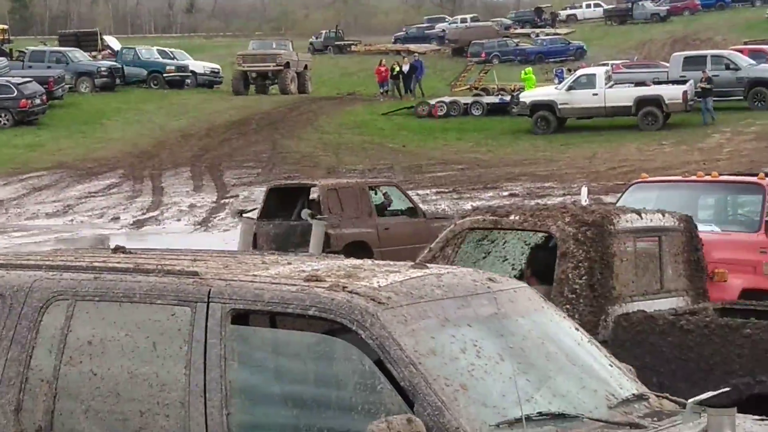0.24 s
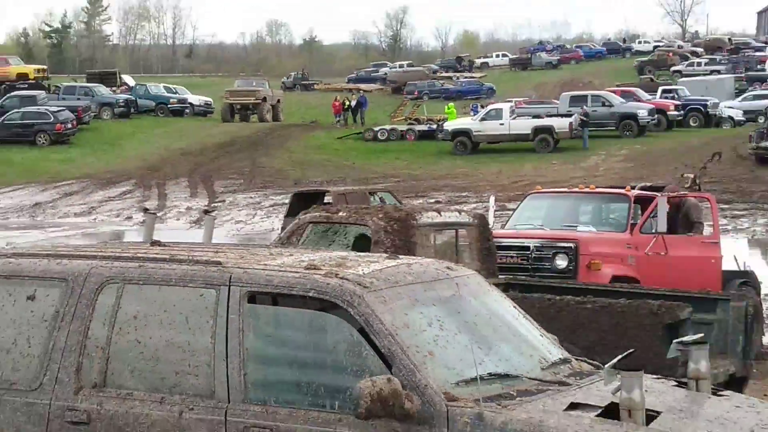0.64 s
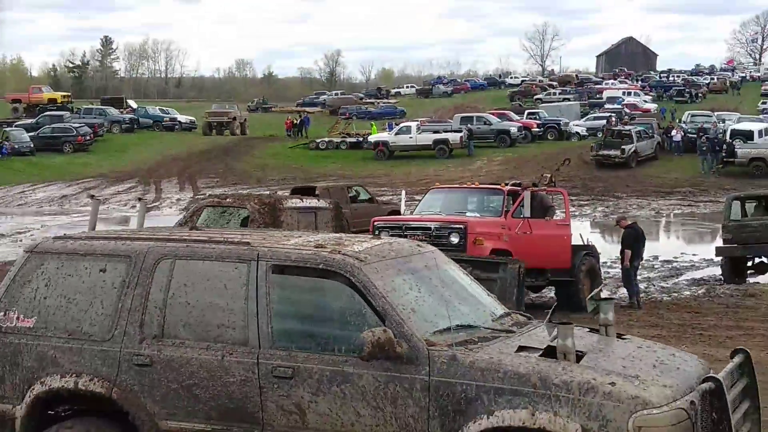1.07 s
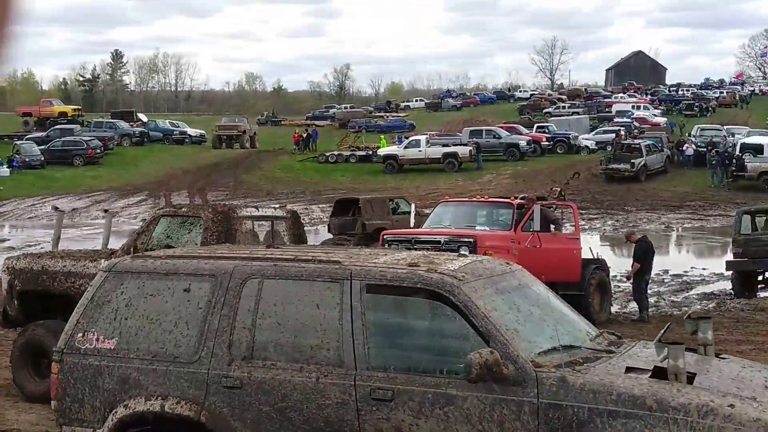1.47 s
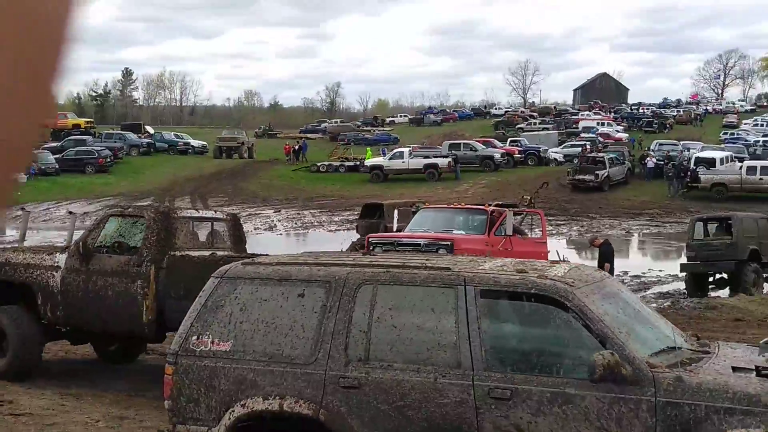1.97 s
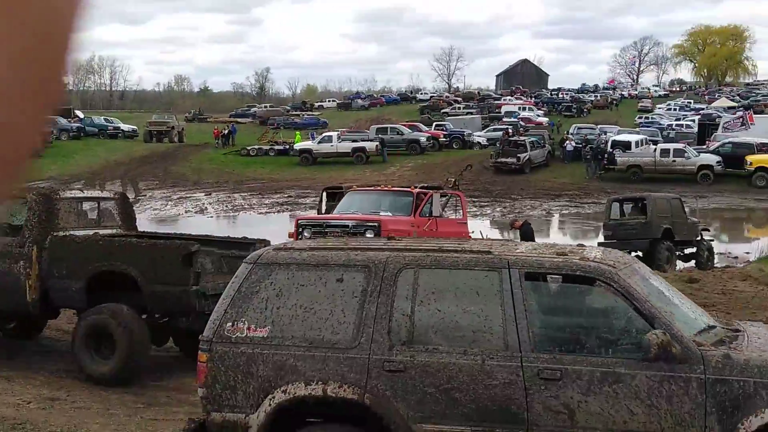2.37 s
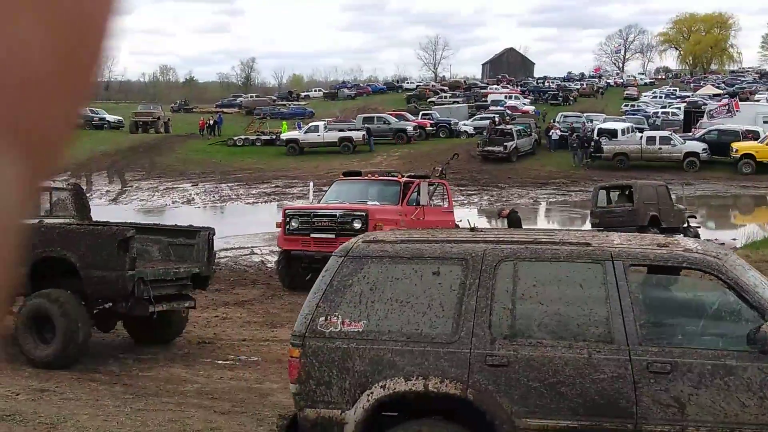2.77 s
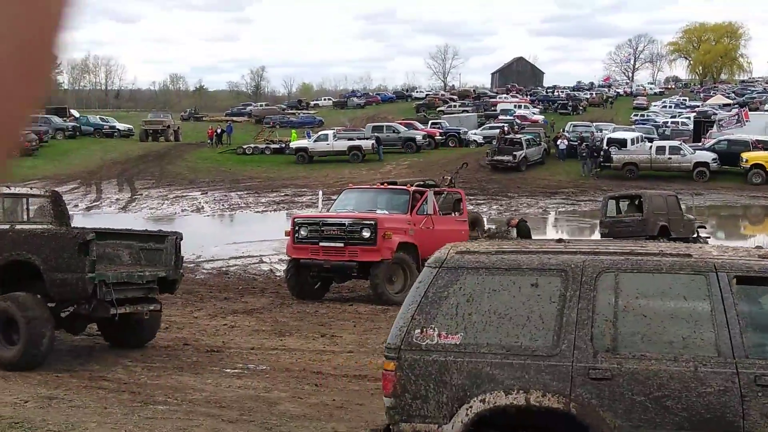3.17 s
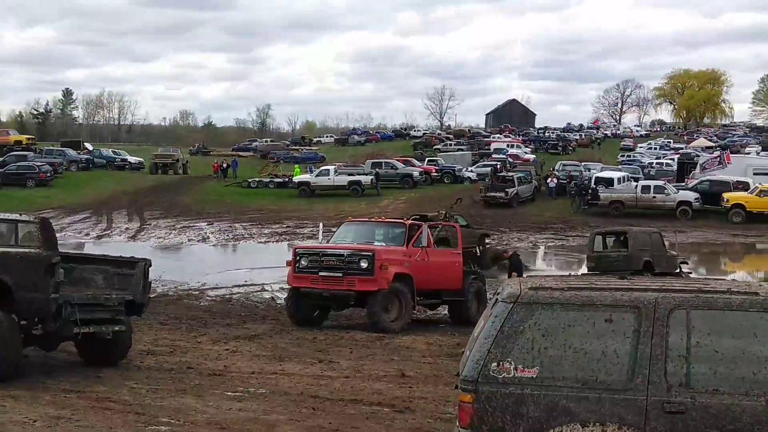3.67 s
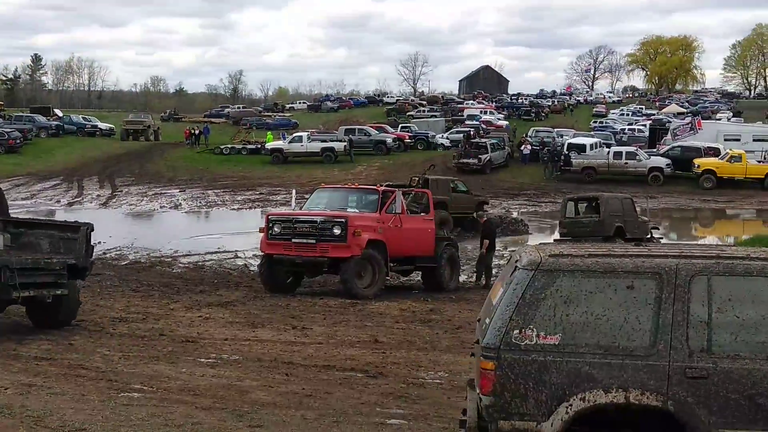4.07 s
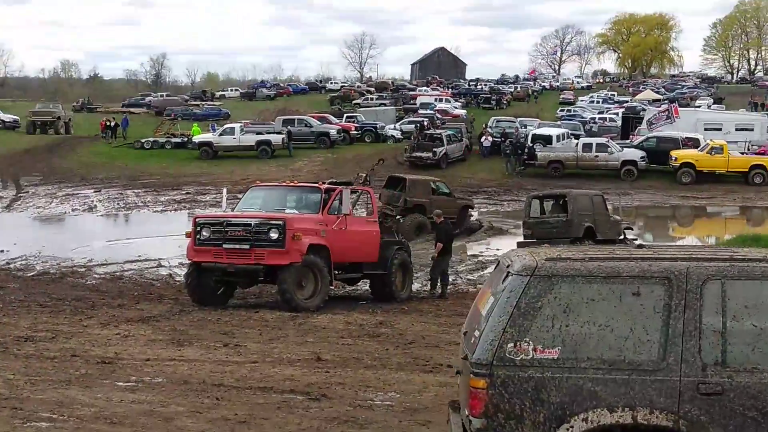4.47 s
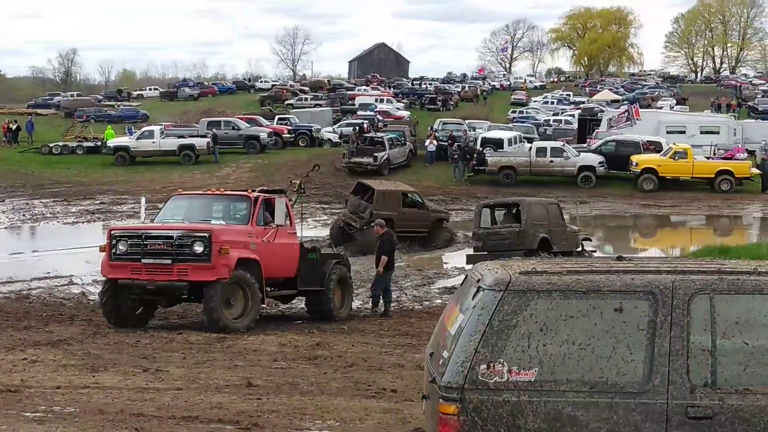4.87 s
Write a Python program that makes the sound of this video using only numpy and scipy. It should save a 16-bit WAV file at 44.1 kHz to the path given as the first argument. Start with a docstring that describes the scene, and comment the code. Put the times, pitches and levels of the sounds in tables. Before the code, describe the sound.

Fierce wet splashing bursts from a truck's exhaust for over a second, then quiets to watery spurts, low engine rumble and a late rev.

```python
"""Mud truck at a flooded pit

A mud truck drives by, its wet exhaust spitting muddy spray with every firing: a loud splashing hiss on open throttle,
then soft gushes and spurts at idle. The spray is ringing droplets and mist; engines are sine lines and shaped noise.
Other trucks idle around it and one revs up at the end, over the faint hiss of an open field.
The hand-held microphone pair takes soft bumps; its two sides are opposite in polarity, so shared bass is out of phase."""
import sys
import numpy as np
from scipy import signal
from scipy.fft import rfft, irfft, next_fast_len
from scipy.io import wavfile
from scipy.ndimage import map_coordinates

SR = 44100
rng = np.random.default_rng(int(sys.argv[2]) if len(sys.argv) > 2 else 0)


def log_audio(samples):
    """Write samples as a 16-bit WAV file to the path given in sys.argv[1]."""
    # one column per channel
    frames = np.atleast_2d(samples).T
    # limit to full scale, then quantise
    limited = np.clip(frames, -1, 1)
    pcm = np.round(limited * 32767).astype(np.int16)
    wavfile.write(sys.argv[1], SR, pcm)


N = 226497
TOP_HZ = 15750  # upper band limit of the sound

# Speed of the near truck's engine: (time [s], firing rate [firings/s])
FIRING_RATE = [(0.0, 50.5), (0.16, 49.5), (0.3, 62.2), (0.45, 64.8), (0.64, 62.0), (0.85, 74.6),
               (1.06, 68.8), (1.27, 85.9), (1.42, 69.5), (1.58, 56.7), (1.76, 58.2), (2.0, 64.3),
               (2.4, 63.4), (2.85, 63.0), (3.15, 59.7), (3.55, 60.2), (3.85, 57.2), (4.1, 58.2),
               (4.4, 56.9), (4.85, 56.4), (5.14, 62.3)]
# Pushes on its throttle: (peak time [s], half length [s], spray level [dB], pipe bark level [dB],
# muffler thud level [dB])
THROTTLE_PUSHES = [(0.267, 0.017, -24, -13.5, -33), (0.328, 0.035, -16.5, -35, -27),
                   (0.399, 0.026, -23, -28, -40.5), (0.566, 0.057, -18, -46, -45),
                   (0.817, 0.085, -10, -31, -45), (0.91, 0.075, -11, -26, -31.5),
                   (1.141, 0.078, -12.5, -53, -40), (1.197, 0.015, -5, -15, -19.5),
                   (1.284, 0.023, -12, -20, -18), (1.336, 0.036, -19.5, -27, -22),
                   (2.425, 0.052, -39, -33, -53), (3.225, 0.034, -49, -43, -48),
                   (4.743, 0.023, -48, -28, -50)]
# Resonances of its exhaust pipe: (frequency [Hz], width [Hz], level [dB])
PIPE_MODES = [(503, 95, -1), (614.5, 51, 8), (915, 790, -13.5)]
# Resonances of its muffler: (frequency [Hz], width [Hz], level [dB])
MUFFLER_MODES = [(186, 41, 2.5), (466, 30, -3.5)]
# Its exhaust lines: (multiple of the firing rate, level [dB])
NEAR_LINES = [(1, 5), (1.5, -14), (2, 3), (2.5, -6), (3, -8)]
# The throttle opens once [s]
OPEN_S, ATTACK_S, HOLD_S, RELEASE_S = 0.17, 0.066, 1.15, 0.024
# Steady bark of the pipe, and what the open throttle adds to it [dB]
BARK_CLOSED_DB, BARK_OPEN_DB = -47.5, -41.5
# Engine note at the closest point, and against the muffler thud [dB]
NOTE_PASS_DB, NOTE_THUD_DB = -35.5, -4
PASS_S, PASS_HALF_S = 3.7, 2.9  # closest time and half length of the pass [s]


def near_truck():
    """The throttle drives spray and exhaust; pulsing gas noise excites pipe and muffler with every push."""
    throttle = envelope(OPEN_S, ATTACK_S, HOLD_S, RELEASE_S)
    firing_hz = curve(FIRING_RATE)
    turn = 2 * np.pi * np.cumsum(firing_hz) / SR
    beat = np.cos(turn) - 0.16 * np.sin(2 * turn)  # a gas pulse rises faster than it dies
    bark = amp(BARK_CLOSED_DB) + amp(BARK_OPEN_DB) * throttle
    bark = bark + sum_swells((s, half, bark_db) for s, half, _, bark_db, _ in THROTTLE_PUSHES)
    thud = sum_swells((s, half, thud_db) for s, half, _, _, thud_db in THROTTLE_PUSHES)
    gas = rng.standard_normal(N) * amp(2.3 * beat + 6.5 * wobble(25.5))
    pipe = bark * resonances(gas, PIPE_MODES) + thud * resonances(gas, MUFFLER_MODES)
    note_gain = np.hypot(amp(NOTE_PASS_DB) * swell(PASS_S, PASS_HALF_S), amp(NOTE_THUD_DB) * thud)
    note = note_gain * exhaust(firing_hz, NEAR_LINES)
    return spray(throttle, firing_hz) + ports(pipe + note, balance_db=3.5)


# Spray colour on open throttle: (frequency [Hz], left level [dB], right level [dB])
OPEN_COLOUR = [(494, -23.5, -17), (1030, -18, -17), (1410, -15, -8.5), (2020, -12.5, -10),
               (2470, -6.5, -4.5), (3630, -9, -6.5), (4770, -5, 2), (5410, -9, -8), (6200, 0, -0.5),
               (8440, -5.5, -6.5), (11840, 2, -18), (12400, -6, -14), (15600, -19, -16.5)]
# Spray colour at idle, truck side-on: (frequency [Hz], left level [dB], right level [dB])
SIDE_ON_COLOUR = [(820, -26, -40), (1420, -21, -1), (2020, -12, -1.5), (2430, -3.5, -0.5),
                  (3200, -5.5, -0.5), (3780, -12, -2), (5130, -1, 8), (5540, 6, -8), (6000, 4.5, 7.5),
                  (7200, 5.5, 5.5), (9050, 5, 2), (10400, 6.5, -19), (12300, 3.5, -19), (13100, -10, -18),
                  (15200, -21, -20)]
# Spray colour at idle, truck tail-on: (frequency [Hz], left level [dB], right level [dB])
TAIL_ON_COLOUR = [(830, -14, -37), (1400, -17, -2.5), (2050, -11, 3), (2500, -8.5, -1), (3100, 3.5, 2.5),
                  (4200, -16, 2), (4730, -8, 1.5), (5100, -2, 5), (6900, 1, 5.5), (9440, 5, 4),
                  (11050, 8.5, -9.5), (12120, 1.5, -7), (12500, -18, -24), (15000, -40, -30)]
# Passing swells of spray colour: (frequency [Hz], depth [dB])
SPRAY_SWELLS = [(2500, 4), (7000, 3), (11000, 3.5)]
# Narrow resonances that shift as water sloshes in the pipe: (frequency [Hz], depth [dB])
CAVITY_SWELLS = [(1000, 2.4), (3000, 4.2), (11000, 4.2)]
# Brief dropouts of the spray: (time [s], depth [dB])
SPRAY_GAPS = [(.418, -6), (0.542, -12.5), (1.815, -7), (2.732, -18), (2.829, -22), (3.306, -15),
              (3.489, -18), (4.075, -6), (4.506, -10), (4.805, -15)]
GAP_HALF_S = 0.004
TURN_S, TURN_LENGTH_S = 2.98, 0.62  # the truck turns its tail to the listener [s]
SNAP_IDLE_DB = 11  # single drops stand out more while the throttle is closed


def spray(throttle, firing_hz):
    """Each firing throws a puff of droplets; throttle and heading change their colour."""
    drops = spatter(shared=0.16, lag=0.0006935)
    drops = patchy(drops, SPRAY_SWELLS, width_hz=338.2, life=.022, size=512)
    drops = patchy(drops, CAVITY_SWELLS, width_hz=110, life=.07, size=2048)
    turned = np.clip((np.arange(N) / SR - TURN_S) / TURN_LENGTH_S, 0, 1)
    idle = (1 - turned) * coloured(drops, SIDE_ON_COLOUR) + turned * coloured(drops, TAIL_ON_COLOUR)
    wet = unit(np.sqrt(throttle) * coloured(drops, OPEN_COLOUR) + np.sqrt(1 - throttle) * idle)
    splat = filtered(wet, lambda hz: 1 / (1 + (hz / 5000) ** 6))
    fizz = wet - splat
    puff = puffs(firing_hz)
    flicker = amp(1.03 * wobble(130) + 0.28 * wobble(32))
    drop_gain = np.hypot(1, snaps() * amp(SNAP_IDLE_DB * (1.0 - throttle)))
    heavy, fine = flow_levels(throttle) * flicker * drop_gain
    # the fine fizz follows the firings more sharply than the heavy splat
    flow = splat * heavy * puff ** 0.23 * amp(1.5 * wobble(30))
    flow = flow + fizz * fine * puff * amp(-5.0 + 0.54 * wobble(45))
    flow = flow + throttle * fine * unit(puff ** 1.4) * squirts(firing_hz)
    gaps = amp(sum(db * swell(s, GAP_HALF_S) for s, db in SPRAY_GAPS))
    scatter = amp(0.31 * wobble(40) * np.array([[1], [-1]]))  # to either side
    return gaps * (flow + spurts(splat, fizz)) * scatter


# Gushes of water through the idling pipe: (start time [s], hold [s], flow level [dB],
# tilt from fizz towards splat [dB])
WATER_GUSHES = [(0, 0.014, -39, -11), (0.07, 0.11, -30, -14), (1.664, 0.054, -40.5, -18),
                (2.603, 0.038, -36, -6), (3.058, 0.081, -32, 1), (3.364, 0.024, -24.5, -7),
                (3.517, 0.041, -33.5, 0), (3.652, 0.055, -27, -8), (3.782, 0.039, -25.5, -9),
                (3.903, 0.097, -27.5, -2.5), (4.082, 0.17, -30.5, 6), (4.34, 0.1, -27, -6),
                (4.518, 0.25, -32.5, 2.5), (4.698, 0.26, -45, 23.5), (4.891, 0.15, -24.5, -3),
                (5.07, .07, -34.5, 7.5)]
GUSH_ATTACK_S, GUSH_RELEASE_S = 0.016, 0.1
# Flow level and tilt towards splat [dB]: open throttle, then the dribble that runs on from its start
OPEN_DB, OPEN_TILT_DB, DRIBBLE_DB, DRIBBLE_TILT_DB = -17, -5.5, -37, 4.5
PUSH_TILT_DB = -0.5


def flow_levels(throttle):
    """Flow in low splat and high fizz: throttle, dribble, pushes and gushes summed as powers."""
    dribble = np.arange(N) / SR > OPEN_S
    flows = [(throttle, OPEN_DB, OPEN_TILT_DB), (dribble, DRIBBLE_DB, DRIBBLE_TILT_DB)]
    flows += [(swell(s, half), db, PUSH_TILT_DB) for s, half, db, _, _ in THROTTLE_PUSHES]
    for s, hold, db, tilt_db in WATER_GUSHES:
        flows.append((envelope(s, GUSH_ATTACK_S, hold, GUSH_RELEASE_S), db, tilt_db))
    tilt = np.array([[.68], [-.3]])  # share of the tilt in splat and in fizz
    return np.sqrt(sum((shape * amp(db + tilt_db * tilt)) ** 2 for shape, db, tilt_db in flows))


# Rise and fade [s], lead [cycles], constant mist added to the puffs and scatter of puff sizes [dB]
PUFF_RISE_S, PUFF_FADE_S, PUFF_LEAD, PUFF_MIST_DB, PUFF_SCATTER_DB = 0.0038, 0.004, 0.27, -16, 1.5


def puffs(firing_hz):
    """One puff per firing, rising quickly and fading, each of its own size; rms 1."""
    cycles = np.cumsum(firing_hz) / SR + PUFF_LEAD
    age = cycles % 1 / firing_hz
    size = amp(PUFF_SCATTER_DB * rng.standard_normal(N))[cycles.astype(int)]
    shape = (1 - np.exp(-(age / PUFF_RISE_S) ** 2)) * np.exp(-age / PUFF_FADE_S)
    return unit(size * shape + amp(PUFF_MIST_DB))


# Rings of each squirt on open throttle: (frequency [Hz], level [dB], left-right balance [dB])
RINGS = [(6820, -9.5, -0.5), (11300, -13, 8)]
SQUIRT_SCATTER, SQUIRT_FLUTTER = .06, .03  # pitch spread between firings and within one [share]


def squirts(firing_hz):
    """Water forced through the pipe rings, at slightly new pitches with each firing."""
    firing = (np.cumsum(firing_hz) / SR + PUFF_LEAD).astype(int)
    out = np.zeros((2, N))
    for hz, db, balance_db in RINGS:
        scatter = SQUIRT_SCATTER * rng.standard_normal(N)[firing]
        pitch = hz * (1 + scatter + SQUIRT_FLUTTER * wobble(900))
        turn = 2 * np.pi * np.cumsum(pitch) / SR + 2 * np.pi * rng.random((2, N))[:, firing]
        out += amp(db + balance_db * np.array([[.5], [-.5]])) * np.sin(turn)
    return out


# Sudden spurts of mud and water: (time [s], high fizz level [dB], low splat level [dB],
# fade time [s], ring frequency [Hz])
MUD_SPURTS = [(0.002, -27.5, -60, 0.01, 10900), (0.077, -34, -50, 0.0024, 7000),
              (0.09, -34, -50, 0.011, 10300), (0.152, -23, -43, 0.032, 6960),
              (0.177, -16, -26, 0.0044, 7000), (0.193, -19, -36, 0.0057, 11000),
              (0.234, -18, -27, 0.0037, 7000), (0.243, -12.5, -20, .005, 11300),
              (0.262, -4.5, -5, 0.0038, 9500), (.312, -15, -26, .004, 6900),
              (0.341, -10, -16, 0.0042, 11500), (0.359, -13, -7, 0.0059, 3630),
              (0.422, 3.5, -8, 0.0033, 7050), (0.454, -13, -21, 0.015, 10400),
              (0.547, -10, -22, 0.01, 7150), (.578, -8, -16, 0.0047, 6300), (0.591, -6, -19, 0.0042, 11500),
              (0.689, -5, -27, 0.0044, 7200), (0.719, -8.5, -20, 0.0082, 11700),
              (0.803, -7, -26, 0.0068, 11600), (0.833, -10, -18, 0.0041, 11700),
              (0.876, -10, -4, .005, 7000), (0.901, -5, -14, 0.0045, 6300), (1.039, -2, -5.5, 0.0042, 5800),
              (1.056, 0, -24, 0.0038, 11000), (1.084, -8, -20, 0.0031, 11300),
              (1.102, -15, -7, 0.006, 6700), (1.139, -9, -6, 0.01, 7250), (1.207, -11, -7.5, 0.028, 6700),
              (1.247, -16.5, -5.5, 0.05, 7000), (1.323, -10, -14, 0.0037, 7000),
              (1.347, -3.5, -15, 0.0061, 6700), (1.377, -6, -28, 0.0031, 11800),
              (1.403, -13.5, -22, 0.0086, 6600), (1.446, -18, -40, 0.0038, 6760),
              (1.667, -24.5, -54, 0.0069, 7900), (1.697, -25, -44, 0.0087, 8700),
              (1.735, -17, -30, 0.0048, 9100), (1.751, -24, -28, 0.0044, 7000),
              (1.78, -36, -22, 0.012, 2800), (1.833, -29, -32, 0.028, 8700),
              (1.965, -34, -27, 0.005, 11000), (1.995, -33, -31, 0.033, 6500),
              (2.042, -18, -20, 0.0039, 10000), (2.089, -26, -41, 0.0047, 10700),
              (2.215, -26.5, -21, 0.0052, 5170), (2.245, -29, -22, 0.02, 5230),
              (2.339, -23, -40, 0.0046, 8700), (2.359, -36, -52, 0.023, 8600),
              (2.501, -31.5, -21, 0.006, 10500), (2.593, -30, -47, 0.012, 9900),
              (2.62, -38, -32, 0.023, 5900), (2.752, -32, -27, 0.028, 6340),
              (2.847, -23, -50, 0.011, 10600), (2.917, -35, -26, 0.0089, 5140),
              (2.979, -31, -37, 0.0035, 9500), (3.009, -24, -18, 0.0036, 9500),
              (3.054, -25.5, -18.5, 0.016, 3170), (3.089, -27, -31, 0.0055, 6750),
              (3.108, -20, -35, 0.0057, 6900), (3.123, -15.5, -39, 0.0055, 11100),
              (3.188, -38, -23, 0.01, 2460), (3.253, -38, -32, 0.11, 6260), (3.372, -26, -45, 0.01, 10500),
              (3.418, -36, -26, 0.023, 5460), (3.456, -24, -14.5, 0.0088, 3700),
              (3.507, -18.5, -40, 0.0075, 10500), (3.526, -20.5, -33, 0.0086, 10400),
              (3.542, -21, -29, 0.0094, 10700), (3.588, -26, -18.5, 0.012, 10700),
              (3.612, -30, -34, 0.0034, 7000), (3.639, -16, -18.5, 0.0062, 11000),
              (3.674, -13, -26, 0.0052, 10600), (3.689, -20, -18, 0.01, 10500),
              (3.724, -17, -17, 0.0065, 11200), (3.775, -12, -32, 0.012, 6640),
              (3.811, -18, -17, 0.0071, 10900), (3.828, -17, -22, 0.0044, 10800),
              (3.862, -22.5, -10.5, 0.0093, 3270), (3.917, -24, -37, .009, 8300),
              (3.936, -15, -38, 0.006, 7000), (3.953, -17, -41, 0.0061, 10800),
              (4.14, -40, -12.5, 0.0071, 3560), (4.241, -30, -16, 0.011, 3980),
              (4.28, -31, -14.5, 0.0054, 3520), (4.332, -20, -24, 0.016, 6700),
              (4.367, -15.5, -37, 0.0073, 10600), (4.408, -18, -32, .005, 10900),
              (4.421, -16.5, -20, 0.0048, 10500), (4.489, -19, -18.5, 0.0054, 10300),
              (4.506, -26.5, -33, 0.016, 10800), (4.561, -26, -17, 0.0093, 3060),
              (4.612, -27.5, -24, 0.017, 11100), (4.701, -18.5, -13, 0.0046, 5950),
              (4.841, -39, -8, 0.0051, 3300), (4.932, -18, -13, 0.0042, 10700),
              (4.947, -22, -13, 0.0052, 7000), (4.981, -12, -14, 0.0046, 10500),
              (5.006, -20, -12, 0.0032, 10900), (5.033, -15, -16, 0.0059, 10600)]
# Rise [s], sharpness of the ring, and its level against the burst [dB]
SPURT_RISE_S, SPURT_RING_Q, SPURT_RING_DB = 0.0029, 12, 5


def spurts(splat, fizz):
    """Each spurt is a sudden burst of droplets that rings a resonance at its own pitch."""
    out, t = np.zeros((2, N)), np.arange(SR // 10) / SR
    for s, fizz_db, splat_db, fade, hz in MUD_SPURTS:
        start = round(s * SR)
        span = slice(start, start + len(t))
        shape = (1 - np.exp(-(t / SPURT_RISE_S) ** 2)) * np.exp(-t / fade)
        spurt = amp(fizz_db) * burst(fizz, span, shape) + amp(splat_db) * burst(splat, span, shape)
        ring = signal.lfilter(*signal.iirpeak(hz, SPURT_RING_Q, fs=SR), spurt)
        out[:, span] += spurt + amp(SPURT_RING_DB) * ring
    return out


def burst(x, span, shape):
    """A stretch of the droplet noise x under a shape, at the mean strength of x."""
    piece = x[:, span] * shape
    return piece * x.std() * np.sqrt(np.mean(shape ** 2) / np.mean(piece ** 2))


# Fat drops: rate [1/s], least size and size range against the flow [dB], fade time [s]
SNAPS_PER_S, SNAP_LEAST_DB, SNAP_RANGE_DB, SNAP_S = 82, -20, 12, 0.00087


def snaps():
    """Fat drops snap out of the flow at random: a sudden start and a quick fade each."""
    when, size = rng.random((int(SNAPS_PER_S * N / SR), 2)).T
    hits = np.bincount((when * N).astype(int), amp(SNAP_LEAST_DB + SNAP_RANGE_DB * size), N)
    return signal.lfilter([1], [1, -np.exp(-1 / (SNAP_S * SR))], hits)


def spatter(shared, lag):
    """Stereo droplets; the shared part reaches the left later and the right inverted."""
    near, left, right = (droplets(ring=0.0008, spread_db=13.5, mist_db=0.5, count=16000) for _ in range(3))
    both = filtered(near, lambda hz: np.array([np.exp(-2j * np.pi * hz * lag), -np.ones_like(hz)]))
    return np.sqrt(shared) * both + np.sqrt(1 - shared) * np.array([left, right])


def droplets(ring, spread_db, mist_db, count):
    """Droplets burst at random, each ringing briefly at its own rising pitch, amid a fine noise mist."""
    when, pitch, size, phase = rng.random((count, 4)).T[..., None]
    t = np.arange(SR // 150) / SR
    cycles = pitch * TOP_HZ * t * (1 + 4 * t) + phase
    pings = amp(spread_db * size ** 2) * np.exp(-t / ring) * np.sin(2 * np.pi * cycles)
    where = (when * N).astype(int) + np.arange(len(t))
    drops = unit(np.bincount(where.ravel(), pings.ravel(), N)[:N])
    return unit(drops + amp(mist_db) * rng.standard_normal(N))


# Exhaust lines of the revving truck: (multiple of the firing rate, level [dB])
REVVING_LINES = [(1, -3.5), (1.5, -12), (2, -30), (3, -18)]
# Colour of its roar: (frequency [Hz], level [dB])
ROAR_COLOUR = [(40, -43), (100, -14), (155, 3), (215, 2.5), (300, -10.5), (500, -11), (700, -19),
               (1000, -17), (2000, -27), (4000, -72)]
REV_S, REV_ATTACK_S, REV_HOLD_S, REV_RELEASE_S, ROAR_DB, REV_NOTE_DB = 4.845, 0.077, 0.085, 0.3, -24, -14.5
REV_IDLE_HZ, REV_TOP_HZ, REV_LAG_S = 99.1, 173, .12  # firing rate climbs from idle towards the top


def revving_truck():
    """Another truck opens up: a rising exhaust note in a rough noise roar."""
    since = np.maximum(np.arange(N) / SR - REV_S, 0)
    firing_hz = REV_TOP_HZ - (REV_TOP_HZ - REV_IDLE_HZ) * np.exp(-since / REV_LAG_S)
    note = ports(amp(REV_NOTE_DB) * exhaust(firing_hz, REVVING_LINES), balance_db=0.7)
    roar = amp(ROAR_DB) * low_noise(ROAR_COLOUR, apart_db=0, balance_db=-0.5)
    return envelope(REV_S, REV_ATTACK_S, REV_HOLD_S, REV_RELEASE_S) * (note + roar)


# Soft bumps of the hand: (time [s], peak level [dB], frequency [Hz], half length [s],
# left-right balance [dB])
HAND_BUMPS = [(1.729, -15.5, 100, 0.02, 3), (2.846, -15, 64.3, 0.013, 3.5), (2.884, -15, 72, 0.014, -3.5),
              (4.087, -8, 104, 0.0098, 8.5), (4.15, -22.5, 170, 0.011, 6.5), (4.309, -12, 113, 0.0075, 3.5),
              (4.655, -14, 95, 0.0061, 1.5), (4.889, -13, 97, 0.0057, 7.5)]


def bumps():
    """Each soft bump rocks the microphones for a cycle or two, with a faint octave above."""
    out, t = np.zeros((2, N)), np.arange(N) / SR
    for s, db, hz, half, balance_db in HAND_BUMPS:
        turn = 2 * np.pi * hz * (t - s)
        rock = np.cos(turn) + amp(-20.5) * np.sin(2 * turn)
        out -= ports(amp(db) * swell(s, half) * rock, balance_db)
    return out


# Exhaust lines of the first idling truck: (multiple of the firing rate, level [dB])
FIRST_LINES = [(1, -1), (2.5, -17), (3, -4), (4, -3.5), (4.5, -13.5), (5, -26), (7, -26)]
# Exhaust lines of the second: (multiple of the firing rate, level [dB])
SECOND_LINES = [(1, -36), (1.5, -26), (2, 4), (2.5, -3), (3, -26)]
# Level swells of the second: (peak time [s], half length [s], level [dB])
SECOND_SURGES = [(.33, 0.12, -23), (1.1, 0.61, -30.5), (2.17, 0.22, -22), (4.2, 0.41, -27.5)]
# Burble colour of the first: (frequency [Hz], level [dB])
BURBLE_COLOUR = [(120, -12.5), (270, -1), (420, -13.5), (800, -32), (2000, -58)]
# Lumps in its burble: (peak time [s], half length [s], level [dB])
BURBLE_LUMPS = [(0.067, .12, -43), (1.954, 0.08, -50), (2.62, 0.017, -40), (2.803, 0.019, -37),
                (2.94, .025, -37), (3.1, .04, -36.5), (3.384, 0.021, -45), (3.54, 0.044, -46)]
# Colour of the uneven exhaust rumble: (frequency [Hz], level [dB])
RUMBLE_COLOUR = [(20, -40), (48, -8.5), (62, 1.5), (80, 1.5), (110, -5.5), (145, -4.5), (205, -11),
                 (270, -16), (360, -21.5), (470, -21.5), (600, -23.5), (760, -22), (1100, -31.5),
                 (2500, -41.5)]
# Passing swells of colour in burble and rumble: (frequency [Hz], depth [dB])
RUMBLE_SWELLS = [(260, 5.4), (450, 3.8)]
# First truck: idle firing rate and level; a gentle rev lifts both
FIRST_HZ, FIRST_DB, FIRST_REV_HZ, FIRST_REV_DB = 59.5, -39.5, 6.4, 9
FIRST_REV_S, FIRST_REV_HALF_S = 2.9, 0.96
SECOND_HZ, SECOND_DB = 52.8, -30.5


def trucks():
    """Two idling engines, the first with a lumpy burble, over the uneven rumble of the others."""
    rev = swell(FIRST_REV_S, FIRST_REV_HALF_S)
    first_db = FIRST_DB + FIRST_REV_DB * rev
    first = amp(first_db) * exhaust(FIRST_HZ + FIRST_REV_HZ * rev, FIRST_LINES)
    surges = sum((amp(db) * swell(s, half)) ** 2 for s, half, db in SECOND_SURGES)
    second_gain = np.sqrt(amp(SECOND_DB) ** 2 + surges)
    second = second_gain * exhaust(SECOND_HZ + 1.156 * wobble(1.5), SECOND_LINES)
    burble_gain = (amp(first_db - 12.0) + sum_swells(BURBLE_LUMPS)) * amp(4.2 * wobble(20))
    burble = low_noise(BURBLE_COLOUR, apart_db=-1.5, balance_db=7.0)
    burble = burble_gain * patchy(burble, RUMBLE_SWELLS, width_hz=41.8, life=0.062, size=2048)
    rumble = low_noise(RUMBLE_COLOUR, apart_db=-6.0, balance_db=-0.5)
    rumble = patchy(rumble, RUMBLE_SWELLS, width_hz=75.7, life=0.11, size=2048)
    throb = amp(1.54 * wobble(16))  # all of them rise and fall together
    return throb * (ports(first + second, balance_db=2.5) + burble + amp(-30.5) * rumble)


# Loping engines: swell of each line [dB], stumble of the speed [share], phase drift of each line [rad]
LOPE_DB, STUMBLE, WANDER_RAD = 4, 0.03, 0.61


def exhaust(firing_hz, lines):
    """Lines of one engine, each swelling and wandering as the cylinders fire unevenly; rms 1."""
    phase = 2 * np.pi * np.cumsum(firing_hz * (1 + STUMBLE * wobble(22))) / SR
    out = np.zeros(N)
    for multiple, db in lines:
        gain = amp(db + LOPE_DB * wobble(24))
        drift = WANDER_RAD * wobble(28) + 2 * np.pi * rng.random()
        out += gain * np.sin(round(2 * multiple) / 2 * phase + drift)
    return unit(out)


# Colour of the far field hiss: (frequency [Hz], level [dB])
AIR_COLOUR = [(200, 15), (900, 10), (2400, 10), (4000, -26), (7000, 11.5), (11000, -26), (15500, -30)]


def air():
    """Faint hiss of the open field: shaped noise, separate on each side."""
    noise = rng.standard_normal((2, N))
    return amp(-46.5) * unit(filtered(noise, lambda hz: along(AIR_COLOUR, hz)))


def ports(x, balance_db):
    """A low sound reaches both microphones, with opposite signs."""
    return np.array([x * amp(balance_db / 2), -x * amp(-balance_db / 2)])


def low_noise(colour, apart_db, balance_db):
    """Noise of rms 1: a part common to both microphones plus a separate part on each."""
    noise = filtered(rng.standard_normal((3, N)), lambda hz: along(colour, hz))
    return unit(ports(noise[0], balance_db) + amp(apart_db) * noise[1:])


def patchy(x, depths, width_hz, life, size):
    """Random swells of gain, each covering one band for a moment; rms 1."""
    hz, t, z = signal.stft(x, SR, nperseg=size)
    knots = rng.standard_normal((int(hz[-1] / width_hz) + 3, int(t[-1] / life) + 3))
    field = map_coordinates(knots, np.meshgrid(hz / width_hz, t / life, indexing="ij"), order=1)
    depth_db = np.interp(hz, *np.transpose(depths))[:, None]
    return unit(signal.istft(z * amp(depth_db * field), SR, nperseg=size)[1][..., :N])


def coloured(pair, colour):
    """Each side gets its own colour, with the bass rolled off; rms 1."""
    table = np.array(colour)

    def response(hz):
        sides = np.array([along(table[:, [0, side]], hz) for side in (1, 2)])
        return hz ** 2 / (hz ** 2 + 400 ** 2) * sides

    return unit(filtered(pair, response))


def resonances(x, modes):
    """x through (Hz, width Hz, dB) band-pass resonances of alternating sign; rms 1."""
    def response(f):
        total = 0
        for k, (centre, width, db) in enumerate(modes):
            damping = 1j * f * width
            total = total + (-1) ** k * amp(db) * damping / (centre * centre - f * f + damping)
        return total

    return unit(filtered(x, response))


def filtered(x, response):
    """x times a complex response of frequency."""
    m = next_fast_len(N + SR // 4)
    return irfft(rfft(x, m) * response(np.fft.rfftfreq(m, 1 / SR)), m)[..., :N]


def envelope(start, attack, hold, release):
    """A straight attack, a hold and a straight release, 0-1."""
    t = np.arange(N) / SR - start
    return np.clip(np.minimum(t / attack, 1 - (t - attack - hold) / release), 0, 1)


def swell(peak, half):
    """A bell-shaped rise and fall, 0-1."""
    return np.exp(-((np.arange(N) / SR - peak) / half) ** 2)


def sum_swells(rows):
    """Summed gain of (peak s, half length s, dB) swells."""
    return sum(amp(db) * swell(s, half) for s, half, db in rows)


def wobble(rate):
    """A smooth random curve, rate knots a second."""
    return map_coordinates(rng.standard_normal(int(N * rate / SR) + 4), [np.arange(N) * rate / SR])


def curve(points):
    """(s, value) points joined by straight lines, one value per sample."""
    return np.interp(np.arange(N) / SR, *np.transpose(points))


def along(points, hz):
    """Gain of (Hz, dB) points on a log axis."""
    f, db = np.transpose(points)
    return amp(np.interp(np.log(hz + 1), np.log(f + 1), db))


def amp(db):
    """Decibels to gain."""
    return 10 ** (np.asarray(db) / 20)


def unit(x):
    """x at rms 1."""
    return x / np.sqrt(np.mean(x ** 2) + 1e-20)


def scene():
    """The near truck, the revving truck and the hand bumps, over the idling trucks and the open field."""
    return near_truck() + revving_truck() + bumps() + trucks() + air()


def record(dry):
    """Peaks near full scale are rounded off, then everything above the band limit is removed."""
    limited = dry / (1 + np.abs(dry / .95) ** 6) ** (1 / 6)
    return filtered(limited, lambda hz: hz < TOP_HZ)


dry = scene()
out = record(dry)
log_audio(out)
```